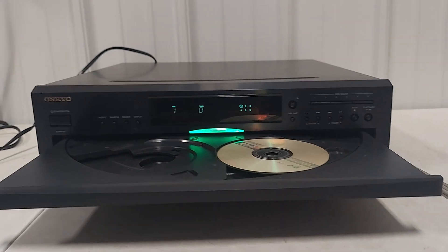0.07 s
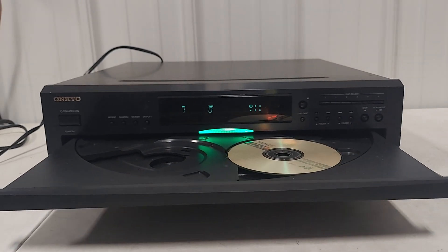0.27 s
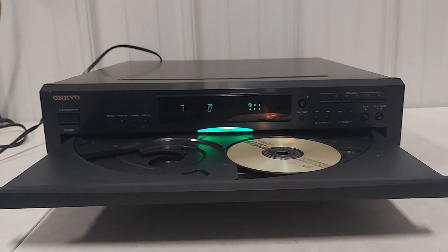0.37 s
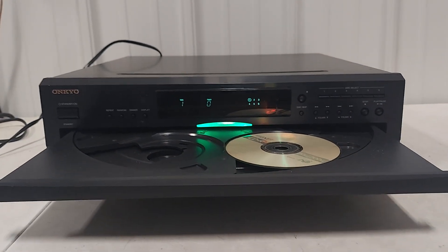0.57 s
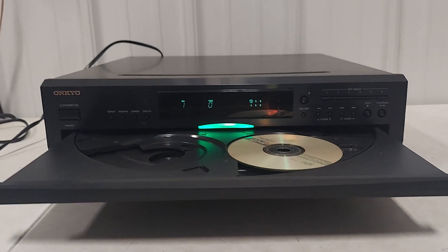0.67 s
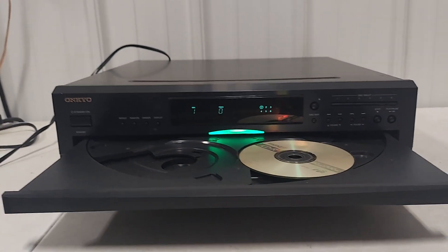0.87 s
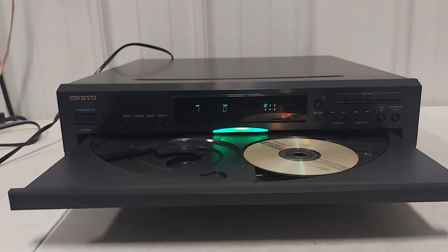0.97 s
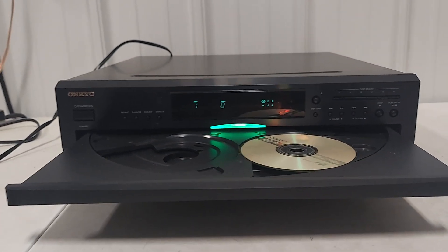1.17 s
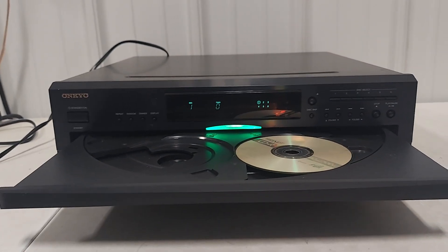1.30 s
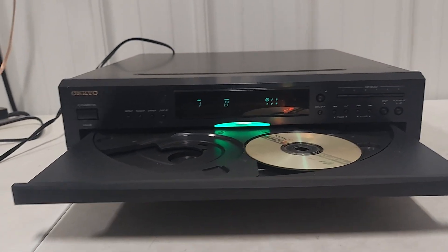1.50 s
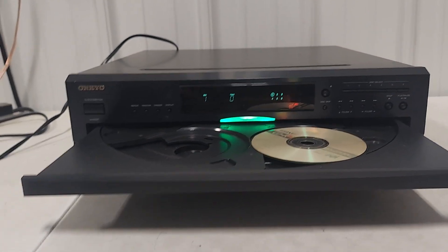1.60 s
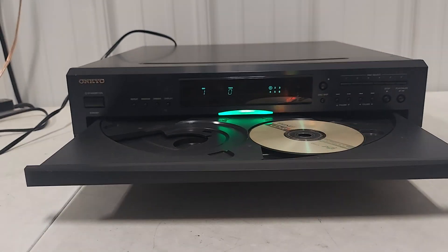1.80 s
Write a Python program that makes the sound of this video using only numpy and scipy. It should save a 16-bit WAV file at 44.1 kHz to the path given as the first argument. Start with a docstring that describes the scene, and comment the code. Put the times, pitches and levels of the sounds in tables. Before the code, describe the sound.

A shoved plastic and sheet metal object rattles from 0.2 seconds and stops with a loud clunk at 0.35, its panel ringing briefly. A disc changer taps softly at 0.8 and 1.5. Around 1.05 the object shifts again with a short, low judder. A scuff at 1.3 leads into faint handling rustles and squeaks until 1.8, over quiet small-room air and faint electrical hum.

```python
"""A shove beside a disc changer

Beside a disc changer with its tray open, in a small room, something of plastic and sheet metal is shoved.
Friction and impacts make it rattle along until it stops with a loud clunk that rings its panel and catch;
it shifts once more with a short stick-slip judder. The changer gives two soft taps, and a scuff, faint
rustles and squeaks of handling follow, over quiet room air and mains hum."""
import sys
import numpy as np
from scipy import signal
from scipy.fft import rfft, irfft
from scipy.io import wavfile

SR = 44100
rng = np.random.default_rng(int(sys.argv[2]) if len(sys.argv) > 2 else 0)


def waveform_to_disk(signal):
    """Save audio, clipped to [-1, 1], as 16-bit WAV at the path in sys.argv[1]."""
    frames = np.transpose(np.atleast_2d(signal))
    scaled = np.clip(frames, -1, 1) * 32767
    samples = np.round(scaled).astype(np.int16)
    wavfile.write(sys.argv[1], SR, samples)


N = 81585
T = np.arange(N) / SR
SIDE_LAG_S, PORT_SPAN_S, PORT_MISMATCH_DB = 0.00034, 0.00046, -15.5

# Decay of the room. Each row: frequency in Hz, t60 in seconds.
ROOM_DECAY = [(60, .4), (200, 0.69), (500, 0.2), (1200, 0.26), (3000, 0.37), (7000, 0.4), (15000, 0.3)]
# Spectra of the reverberation and the room air. Each row: frequency in Hz, relative density in dB.
ROOM_SPECTRUM = [(50, -7.5), (250, -12), (600, -1.5), (2000, 3), (6000, -1), (16000, 4)]
AIR_SPECTRUM = [(25, -6), (60, -4.5), (120, -2), (165, -12), (240, -6), (350, -16), (500, -12.5),
                (900, -18), (2700, -23.5), (7000, -27.5), (16000, -24.5)]

# Rustling. Each row: time in seconds, relative levels of the middle and of the treble in dB.
RUSTLE_LEVELS = [(.9, -94, -88), (.99, -90.5, -70.5), (1.05, -83.5, -68.5), (1.13, -113.5, -73.5),
                 (1.19, -84.5, -77), (1.28, -94.5, -74), (1.305, -73.5, -51.5), (1.345, -70.5, -63.5),
                 (1.38, -82, -54.5), (1.396, -75, -56.5), (1.41, -86.5, -71.5), (1.48, -80.5, -74.5),
                 (1.515, -85.5, -62.5), (1.575, -91, -70.5), (1.65, -72, -61.5), (1.69, -70, -61),
                 (1.725, -64, -55), (1.755, -77, -64), (1.79, -61, -64), (1.815, -58.5, -65),
                 (1.85, -86, -70)]
# Spectra of the rustle's two bands and the scuff. Each row: frequency in Hz, relative density in dB.
RUSTLE_MIDDLE_SPECTRUM = [(300, -22), (700, -18.5), (1150, 6.5), (1700, -4.5), (2500, -3), (3150, -4),
                          (4200, -1.5), (8000, -16.5)]
RUSTLE_TREBLE_SPECTRUM = [(1000, -22.5), (2500, 0), (4300, -1.5), (5500, 2.5), (7000, 2), (9500, 0),
                          (12000, 4), (14000, -2), (16000, -31.5)]
SCUFF_SPECTRUM = [(300, -46), (600, -16.5), (800, -8), (1250, 2.5), (1800, 7), (2200, 9.5), (3500, -20),
                  (5300, 0.5), (7000, 4), (9500, -10.5), (12000, -7), (16000, -18)]
# The scuff. Each row: time in seconds, level in dB.
SCUFF_LEVELS = [(1.275, -93), (1.291, -72), (1.296, -43), (1.302, -56.5), (1.311, -72.5), (1.34, -81.5)]
# Hollow ring of the scuffed plastic. Each row: frequency in Hz, relative level in dB, t60 in seconds.
SCUFF_MODES = [(804, -2, 0.06), (1810, -0.5, .04), (2015, 4, 0.063)]
# Rubbing squeaks, one list each. Each row: time in seconds, frequency in Hz, level in dB.
SQUEAKS = [
    [(1.35, 5760, -82), (1.385, 5510, -56), (1.41, 5450, -74), (1.46, 5400, -86)],
    [(1.57, 2873, -92.5), (1.63, 3130, -71), (1.68, 3200, -66.5), (1.73, 3350, -64.5), (1.76, 3370, -86.5)],
]

# Taps inside the changer. Each row: start in seconds, relative level in dB, low-pass cutoff in Hz.
TAPS = [(0.8225, -44.5, 1480), (1.4681, -41, 2052)]
# Modes that a tap rings. Each row: frequency in Hz, relative level in dB, t60 in seconds.
TAP_MODES = [(231, -11, .07), (275, -14, .05), (689, -7, .035), (1150, 0, .004), (1626, -8, .008)]
# Reflections off table and wall. Each row: delay in seconds, left gain in dB, right gain in dB.
TAP_ECHOES = [(.003, -11.5, -18.5), (.0048, -13, -12.5), (.0073, -24, -6.5), (.0093, -19, -15.5),
              (0.0108, -12.5, -12.5)]

# Swell of shifting weight. Each row: time in seconds, level in dB.
SWELL_LEVELS = [(.78, -80), (.86, -74), (.9, -73.5), (.93, -63.5), (.96, -74), (1.01, -53.5), (1.05, -63),
                (1.1, -92)]
# Spectrum of the swell. Each row: frequency in Hz, relative density in dB.
SWELL_SPECTRUM = [(30, -12), (55, -6), (92, 2.5), (130, -8.5), (250, -32), (1000, -71.5)]
# Stick-slip. Each row: time in seconds, slips per second, fundamental level in dB, overtone gain in dB.
JUDDER = [(.98, 142, -75, -70), (1.012, 141, -62, -50), (1.032, 139, -56, -39), (1.05, 136, -44, -44),
          (1.066, 134, -33, -40), (1.082, 132, -35, -43), (1.11, 122, -45, -58), (1.15, 116, -55, -70),
          (1.21, 116, -75, -90)]
# Overtones of the judder. Each row: harmonic number, relative level in dB.
JUDDER_OVERTONES = [(2, 2), (3, -4.5), (4, -15), (5, -16), (6, -8.5)]
# Sliding, one list per shift. Each row: time in seconds, relative levels of rumble and of rattle in dB.
SLIDES = [
    [(.197, -53, -51), (.218, -48.5, -44.5), (.24, -39.5, -33), (.254, -44.5, -30.5), (.30, -30.5, -31),
     (.355, -26, -31), (.39, -37, -53), (.465, -35.5, -62), (.51, -63, -68), (.6, -74.5, -108.5)],
    [(.9, -79, -92), (.93, -76, -88), (.96, -79, -75), (1.0, -57.5, -67), (1.032, -44, -52.5),
     (1.075, -46.5, -52.5), (1.10, -45, -75), (1.125, -69, -87.5), (1.19, -83, -69.5), (1.27, -98, -91.5)],
]
# Spectrum of the rattle. Each row: frequency in Hz, relative density in dB.
RATTLE_SPECTRUM = [(200, -15), (600, -5.5), (1000, 8), (1600, 0.5), (2350, 4), (3000, -9.5), (4300, 1),
                   (5700, -4), (7200, -9), (10000, -18.5), (11800, -16.5), (16000, -27.5)]

# Impacts. Each row: start in seconds, relative levels of thud, clack and tick in dB, room send in dB.
KNOCKS = [(0.1986, -74, -73, -32, 4.5), (0.2165, -30.5, -31, -45, 4.5), (0.224, -58, -35.5, -43.5, -28),
          (0.2425, -35, -25, -33, 6.5), (0.2503, -25.5, -19, -42, -1), (0.2542, -30.5, -26, -28.5, -5.5),
          (0.2604, -24.5, -34, -49.5, 4), (0.2759, -27.5, -22.5, -41, 4), (.294, -22, -25, -35, -2),
          (0.3216, -18, -30, -33, 1.5), (0.338, -22, -28, -35, -1), (0.3596, -20.5, -15, -19, -6.5),
          (0.3622, -18, -17.5, -27.5, -5), (0.3651, -22.5, -17.5, -27.5, -1),
          (.395, -28.5, -35.5, -55.5, -2), (.425, -26, -69, -59, 0), (.452, -34.5, -32.5, -66, -1.5),
          (1.054, -54.5, -41.5, -58, 1.5), (1.0605, -45.5, -49, -70, -13), (1.069, -49.5, -41, -79, 0),
          (1.092, -45, -37.5, -68, -20), (1.164, -59, -54, -73, 1), (1.702, -85, -57.5, -63.5, -7),
          (1.759, -65, -84, -74.5, -13.5), (1.818, -82, -58, -70, -5)]
# Spectra of a knock's three parts. Each row: frequency in Hz, relative density in dB.
THUD_SPECTRUM = [(25, -33), (50, -23), (70, -9.5), (120, 6.5), (200, -1.5), (270, 2), (400, -2.5),
                 (620, -2), (900, -12), (1500, -11.5), (4000, -52.5)]
CLACK_SPECTRUM = [(200, -20), (500, -2), (1000, 1), (1500, -2.5), (1850, 3), (2400, -3.5), (3000, -5.5),
                  (4300, -3), (5600, -12), (7200, -16), (10000, -30), (16000, -30)]
TICK_SPECTRUM = [(500, -23.5), (2000, -4.5), (4500, -2.5), (6300, 0.5), (8000, -2.5), (10000, -10),
                 (11700, -2.5), (13500, -13), (16000, -13)]
# Modes of loose parts, panel and catch. Each row: frequency in Hz, relative level in dB, t60 in seconds.
LOOSE_MODES = [(1030, -2, .04), (2260, -2, .03), (2500, 0, .035), (3570, -5, .03), (5500, -4, .02)]
PANEL_MODES = [(66.5, -14.5, 0.48), (119.2, -2.5, .42), (145.5, -2.5, 0.33), (175, -7.5, 0.31),
               (227.5, -15.5, 0.6), (269.4, -5.5, 0.34), (349.6, -2, 0.12), (391.7, -5, 0.14),
               (436, -9.5, .2), (586, -8, .17), (644.5, -16, 0.24), (855, -13, 0.25), (1131, -12, 0.11),
               (1306, -14.5, .17)]
CATCH_MODES = [(1845, 0, .15), (1923, -9, .12), (1997, -5, .14), (2244, -12, .2), (2462, -12, .18)]


def amp(db):
    """Amplitude ratio of a level in decibels."""
    return 10 ** (np.asarray(db) / 20)


def unit_rms(x):
    """Normalisation to an rms of one."""
    return x / np.sqrt(np.mean(x ** 2) + 1e-20)


def at_frequency(points, hz):
    """Interpolation on a logarithmic frequency axis."""
    known_hz, values = np.transpose(points)
    return np.interp(np.log(hz + 1), np.log(known_hz + 1), values)


def envelope(rows, column=1):
    """Amplitude envelope, linear in decibels between rows and silent outside them."""
    rows = np.array(rows)
    return amp(np.interp(T, rows[:, 0], rows[:, column], left=-200, right=-200))


def butterworth(x, order, hz, kind):
    """Maximally flat filter with its cutoff at hz."""
    return signal.sosfilt(signal.butter(order, hz, kind, fs=SR, output="sos"), x)


def excite(force, response):
    """Convolution of a force with an impulse response scaled to unit energy."""
    return signal.fftconvolve(force, response / np.linalg.norm(response))[:N]


def colour(x, spectrum):
    """Minimum-phase filtering to a spectral shape, by folding the cepstrum."""
    gain = amp(at_frequency(spectrum, np.fft.rfftfreq(8192, 1 / SR)))
    cepstrum = irfft(np.log(gain))
    cepstrum[1:4096] *= 2
    cepstrum[4097:] = 0
    return excite(x, irfft(np.exp(rfft(cepstrum)))[:4096])


def ring(modes):
    """Free vibration: a sum of exponentially damped sinusoids."""
    return sum(amp(db - 60 * T / t60) * np.sin(2 * np.pi * hz * T) for hz, db, t60 in modes)


def delay(x, seconds):
    """Pure delay, rounded to a sample."""
    return np.concatenate([np.zeros(max(round(seconds * SR), 0)), x])[:N]


def grains(per_s, spread_db):
    """Shot noise: impulses of random time, sign and size."""
    size = amp(spread_db * np.minimum(rng.exponential(1, N), 3))
    sign = rng.choice([-1, 1], N)
    return unit_rms(size * sign * (rng.random(N) < per_s / SR))


def diffuse_noise():
    """A diffuse field at two microphone ports is coherent in the bass and unrelated in the treble."""
    left, independent = rfft(rng.standard_normal((2, N)))
    coherence = np.sinc(2 * np.fft.rfftfreq(N, 1 / SR) * PORT_SPAN_S) / (1 + amp(PORT_MISMATCH_DB))
    right = coherence * left + np.sqrt(1 - coherence ** 2) * independent
    return irfft(np.array([left, right]), N)


def room(x):
    """Reverberation: a diffuse tail in which each band decays exponentially at its own rate."""
    hz, t, bands = signal.stft(diffuse_noise(), SR, nperseg=256)
    start_db = at_frequency(ROOM_SPECTRUM, hz)[:, None]
    t60 = at_frequency(ROOM_DECAY, hz)[:, None]
    _, tail = signal.istft(bands * amp(start_db - 60 * t / t60), SR, nperseg=256)
    tail = tail[:, :SR] * np.minimum(T[:SR] / 0.0018, 1)
    return signal.fftconvolve(x[None], tail / np.linalg.norm(tail[0]), axes=1)[:, :N]


def direct(x, lag_s=SIDE_LAG_S):
    """A path difference brings sound from the side to the left port first."""
    return np.array([x, delay(x, lag_s)])


def placed(x, wet_db, lag_s=SIDE_LAG_S):
    """Superposition of the direct and the reverberant field."""
    return direct(x, lag_s) + amp(wet_db) * room(x)


def air_and_hum(air_db=-78.5, hum_db=-84.5, hum_hz=119.5):
    """Room air is a diffuse noise field; mains hum adds a steady tone."""
    air = np.array([colour(side, AIR_SPECTRUM) for side in diffuse_noise()])
    return amp(air_db) * air + amp(hum_db) * np.sin(2 * np.pi * hum_hz * T)


def rustles():
    """Friction of handling gives fine grains in the middle band and a diffuse hiss in the treble."""
    rubbing = envelope(RUSTLE_LEVELS) * grains(per_s=2500, spread_db=5)
    middle = placed(colour(rubbing, RUSTLE_MIDDLE_SPECTRUM), wet_db=0)
    hiss = envelope(RUSTLE_LEVELS, column=2) * diffuse_noise()
    treble = np.array([colour(side, RUSTLE_TREBLE_SPECTRUM) for side in hiss])
    return amp([[-2], [1]]) * middle + amp([[-1], [-3]]) * treble


def squeak(rows, bandwidth_hz=350):
    """Rubbing drives a narrow resonance: a band of noise about a drifting centre frequency."""
    times, hz, _ = np.transpose(rows)
    noise = rng.standard_normal((2, N)) + 1j * rng.standard_normal((2, N))
    baseband = butterworth(noise, 2, bandwidth_hz / 2, "lowpass")
    carrier = np.exp(2j * np.pi * np.cumsum(np.interp(T, times, hz)) / SR)
    return envelope(rows, column=2) * unit_rms((baseband * carrier).real)


def scuff():
    """Brief friction radiates noise and excites the modes of hollow plastic."""
    rubbing = envelope(SCUFF_LEVELS) * grains(per_s=5500, spread_db=2.23)
    hollow = amp(-9.5) * excite(rubbing, ring(SCUFF_MODES))
    return placed(colour(rubbing, SCUFF_SPECTRUM) + hollow, wet_db=-4)


def changer_taps():
    """Soft impacts straight ahead ring damped modes; table and wall return early reflections."""
    tap = -ring(TAP_MODES)
    muffled = sum(delay(amp(db) * butterworth(tap, 6, hz, "lowpass"), start) for start, db, hz in TAPS)
    taps = butterworth(muffled, 2, 170, "highpass")
    echoes = sum(amp([[left], [right]]) * delay(taps, lag) for lag, left, right in TAP_ECHOES)
    return placed(taps, wet_db=0.76, lag_s=0) + echoes


def weight_swell():
    """Shifting weight gives a swell of low-frequency noise that leads into the judder."""
    return envelope(SWELL_LEVELS) * colour(rng.standard_normal(N), SWELL_SPECTRUM)


def judder(jitter=0.04, correlation_s=0.0029):
    """Stick-slip: the surface catches and slips almost periodically, giving a harmonic groan."""
    times, slip_hz = np.transpose(JUDDER)[:2]
    pole = np.exp(-1 / (correlation_s * SR))
    wobble = unit_rms(signal.lfilter([1], [1, -pole], rng.standard_normal(N)))
    phase = 2 * np.pi * np.cumsum(np.interp(T, times, slip_hz) * (1 + jitter * wobble)) / SR
    overtones = sum(amp(db) * np.cos(harmonic * phase) for harmonic, db in JUDDER_OVERTONES)
    groan = envelope(JUDDER, column=2) * np.cos(phase) + envelope(JUDDER, column=3) * overtones
    return placed(groan, wet_db=-27)


def slide(rows, wet_db):
    """Sliding friction: dense small slips rumble in the body and excite the modes of loose parts."""
    body_slips = envelope(rows) * grains(per_s=900, spread_db=0.58)
    rattle_slips = envelope(rows, column=2) * grains(per_s=1000, spread_db=4)
    rumble = amp(-1.5) * colour(body_slips, THUD_SPECTRUM)
    rattle = amp(-2.5) * colour(rattle_slips, RATTLE_SPECTRUM)
    ringing = amp(-12) * excite(rattle_slips, ring(LOOSE_MODES))
    return placed(rumble + rattle + ringing, wet_db)


def contact(start, db, decay_s, rise_s=0.0003):
    """Contact chatter: a noise burst with a fast rise and an exponential decay."""
    chatter = unit_rms(np.tanh(2 * rng.standard_normal(N)))
    shape = (1 - np.exp(-T / rise_s)) * np.exp(-T / decay_s)
    return delay(amp(db) * shape * chatter, start)


def knocks():
    """Each impact radiates a thud, a plastic clack and a bright tick; the higher parts decay sooner."""
    thuds, clacks, ticks = np.zeros((3, 2, N))
    for start, thud_db, clack_db, tick_db, room_db in KNOCKS:
        paths = np.array([[1], [amp(room_db)]])  # direct path, path into the room
        thuds += paths * contact(start, thud_db, decay_s=0.012)
        clacks += paths * contact(start, clack_db, decay_s=0.0038)
        ticks += paths * contact(start, tick_db, decay_s=0.003)
    near, room_send = [
        amp(-6) * colour(thud, THUD_SPECTRUM) + colour(clack, CLACK_SPECTRUM) + colour(tick, TICK_SPECTRUM)
        for thud, clack, tick in zip(thuds, clacks, ticks)]
    return direct(near) + room(room_send)


def panel():
    """Modal response: each knock is an impulse that rings the panel in proportion to its thud."""
    impulses = np.zeros(N)
    for start, thud_db, *_ in KNOCKS:
        impulses[round(start * SR)] += amp(thud_db)
    ringing = amp(-10) * signal.fftconvolve(impulses, ring(PANEL_MODES))[:N]
    return amp([[0.7], [-0.7]]) * placed(ringing, wet_db=-10)


def catch(stop_s=0.3625):
    """The impact of the stop sets the catch into free vibration."""
    ringing = delay(amp(-27) * ring(CATCH_MODES), stop_s)
    return amp([[-2], [1]]) * placed(ringing, wet_db=-12, lag_s=0)


def scene():
    """Linear superposition of all sources at the two ports."""
    handling = rustles() + sum(squeak(rows) for rows in SQUEAKS) + scuff()
    sliding = slide(SLIDES[0], wet_db=0) + slide(SLIDES[1], wet_db=-1.5)
    shoving = weight_swell() + judder() + sliding + knocks() + panel() + catch()
    return air_and_hum() + handling + changer_taps() + shoving


def record(dry, low_hz=60, high_hz=16000):
    """Band limiting: a high-pass removes the deep bass, a linear-phase low-pass the highest treble."""
    thinned = butterworth(dry, 4, low_hz, "highpass")
    lowpass = signal.firwin(401, high_hz, window=("kaiser", 9), fs=SR)
    return signal.oaconvolve(thinned, lowpass[None], "same")


dry = scene()
out = record(dry)
waveform_to_disk(out)
```